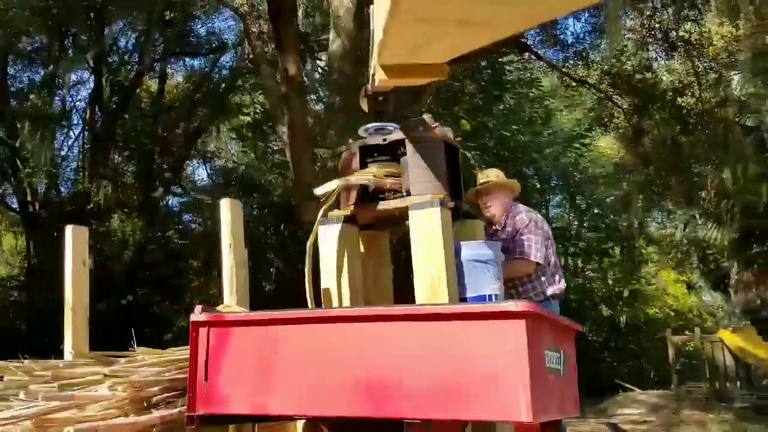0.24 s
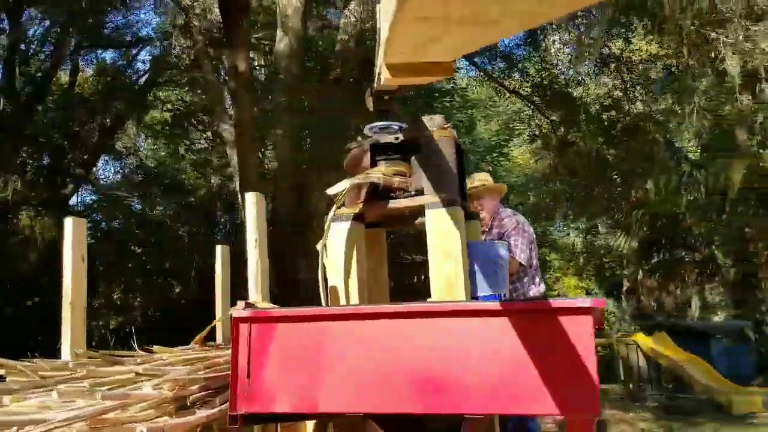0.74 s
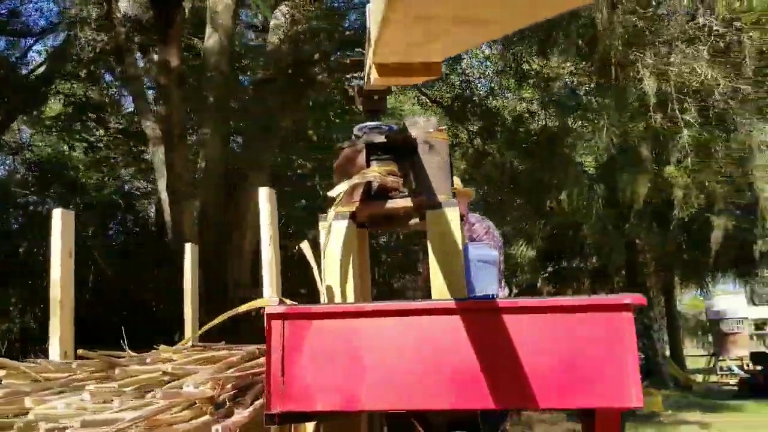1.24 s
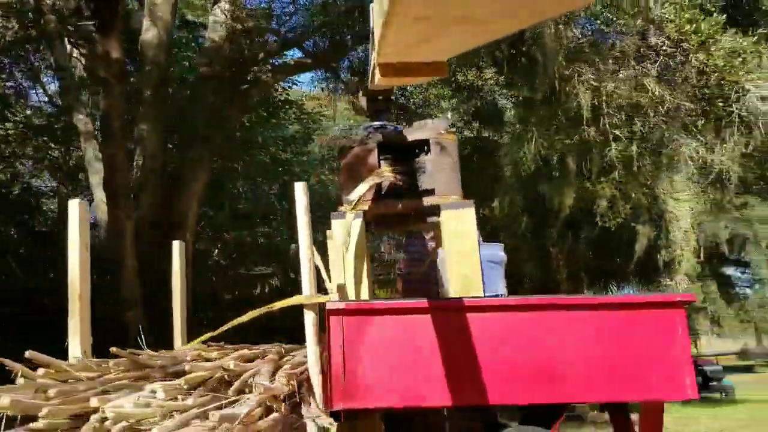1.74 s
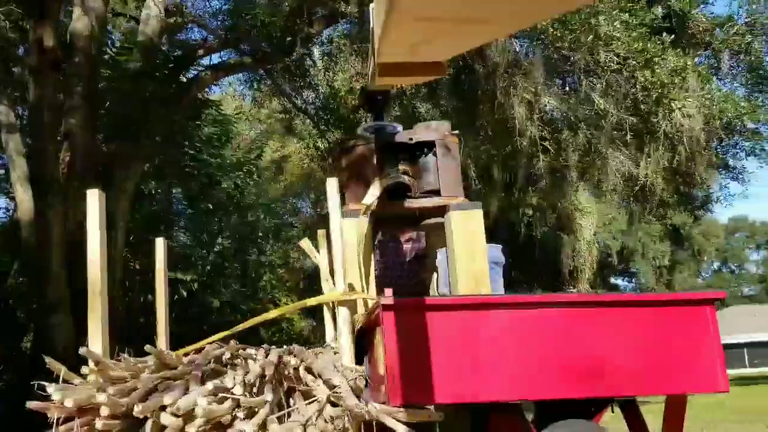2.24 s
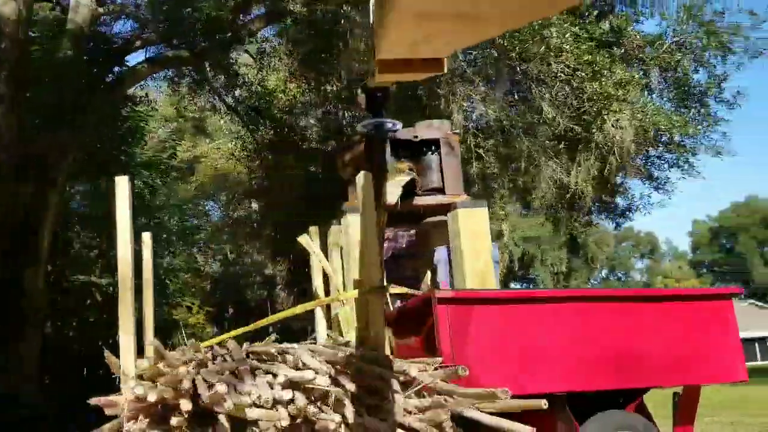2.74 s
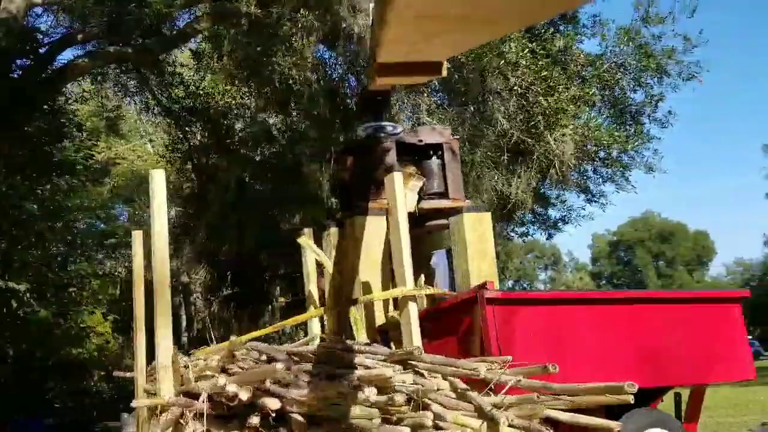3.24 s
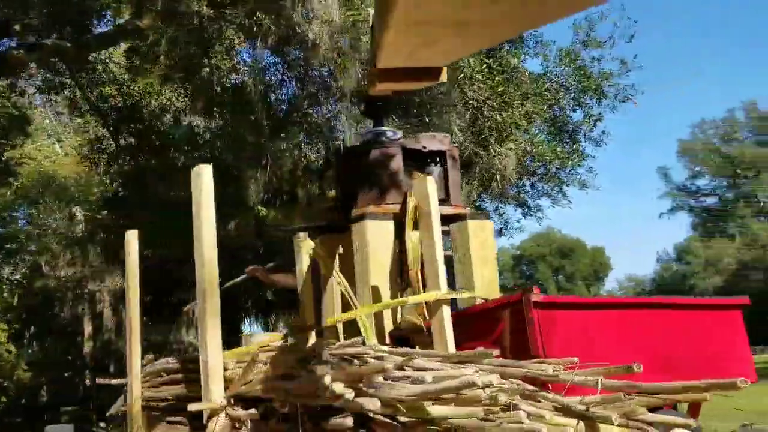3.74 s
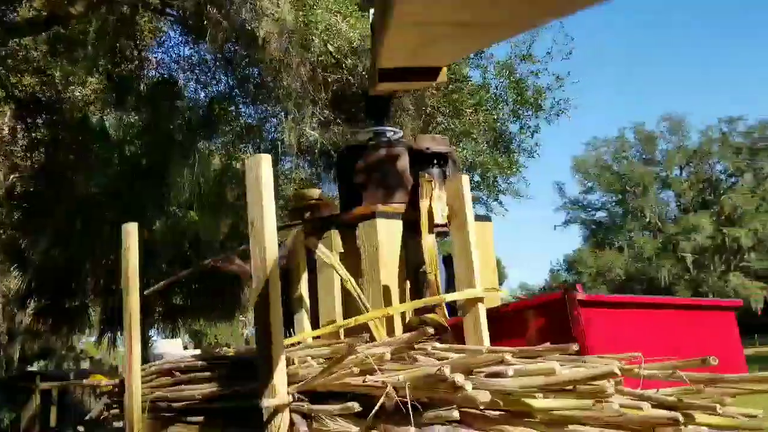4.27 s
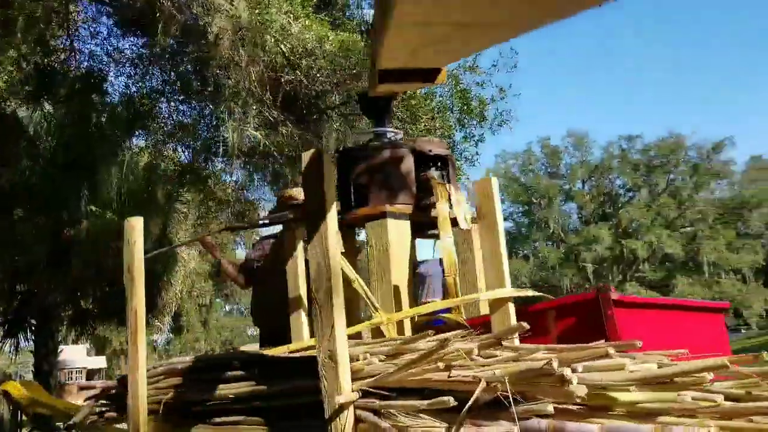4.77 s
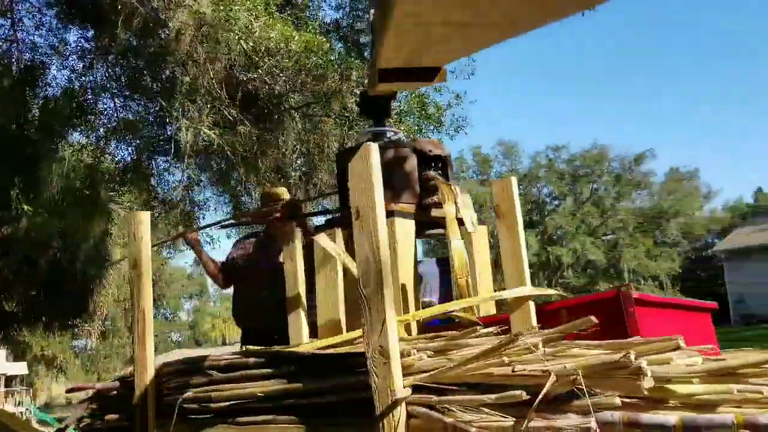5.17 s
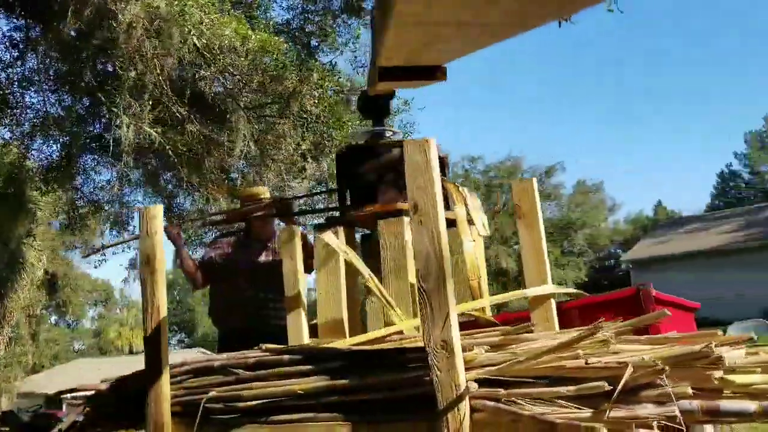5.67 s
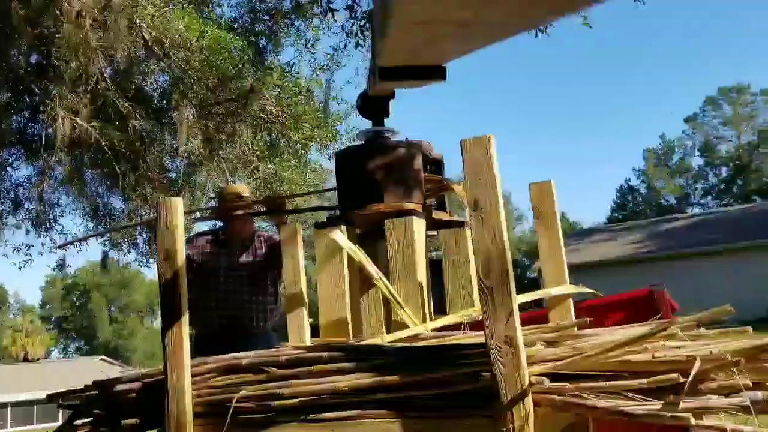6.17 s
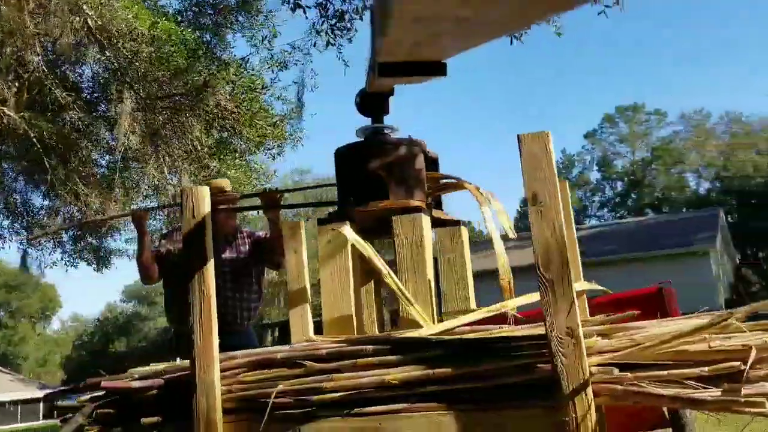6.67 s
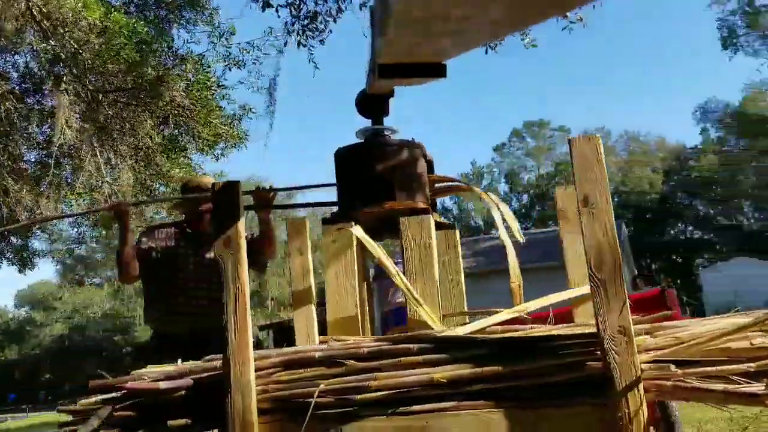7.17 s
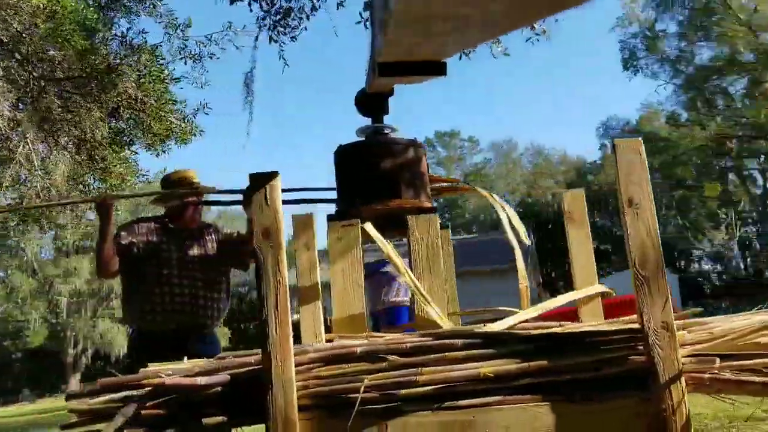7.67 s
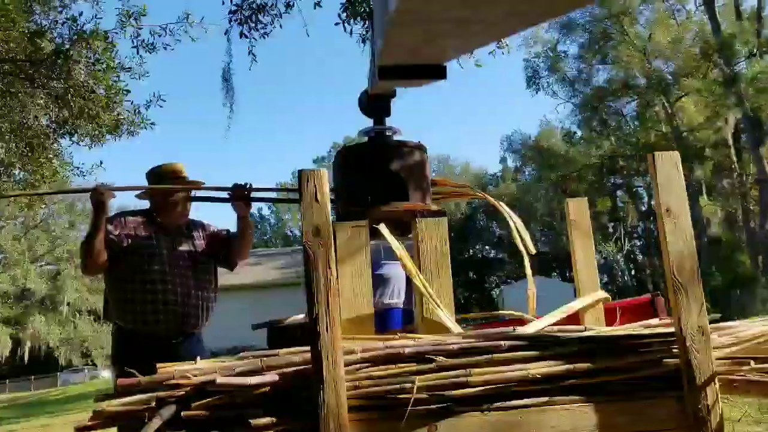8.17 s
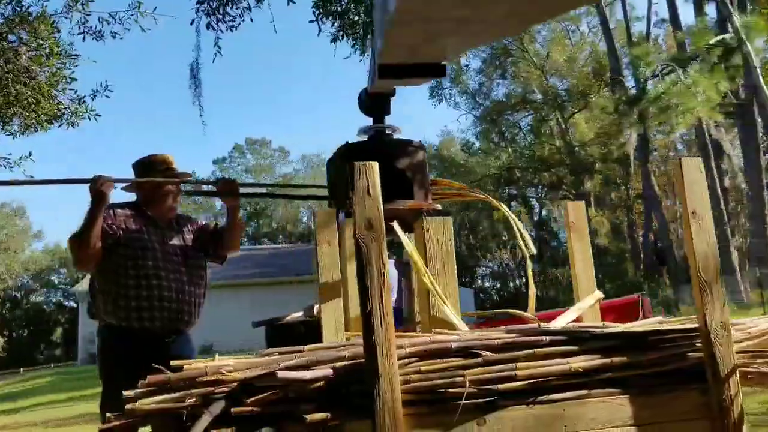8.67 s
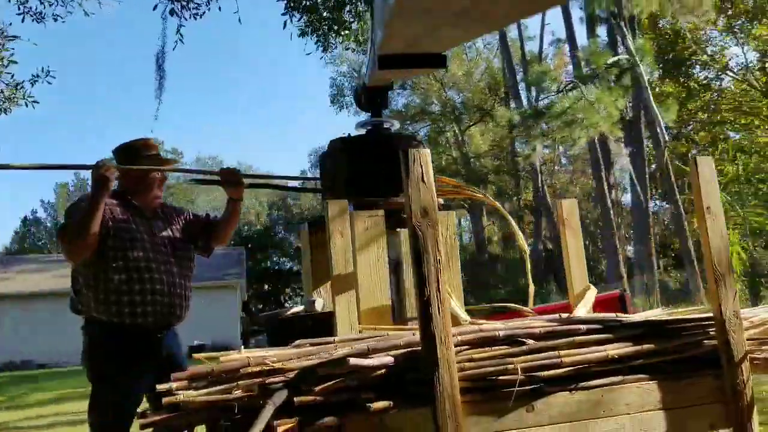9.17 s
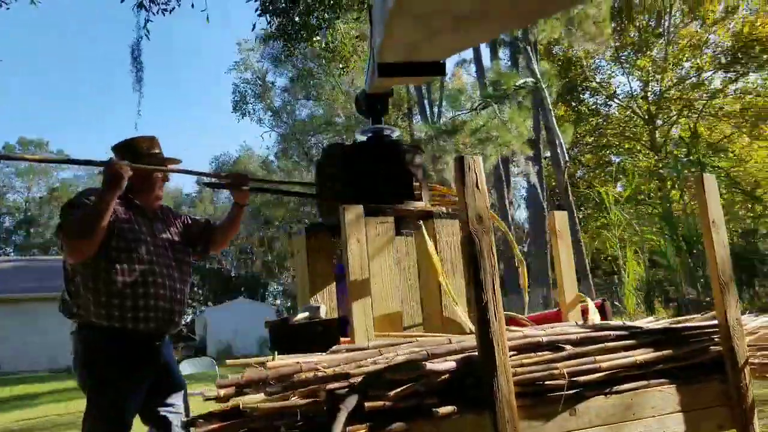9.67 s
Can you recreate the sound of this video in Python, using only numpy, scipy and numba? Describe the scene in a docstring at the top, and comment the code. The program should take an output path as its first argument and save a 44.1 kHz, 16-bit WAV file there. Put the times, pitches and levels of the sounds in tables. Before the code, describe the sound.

A small twin-cylinder engine putters steadily with uneven low thumps, fan rush, metal rattle and iron mill clatter, with dry rustling and occasional stalk snaps.

```python
"""Garden tractor turning a cane mill

A V-twin garden tractor pulls the sweep pole of a cane mill slowly round, with the microphone riding along.
Paired firings, some weak or late, ring the pipe and muffler as thumps; noise puffs behind them make the rasp.
Noise through moving resonances makes the fan's rush, the rattle of the steel covers and the iron mill's clatter.
Fine grains and ticks make dry grass rustle under the tyres, and short bright bursts are snapping stalks."""
import sys
import numpy as np
from scipy import signal
from scipy.fft import rfft, irfft
from scipy.io import wavfile
from scipy.ndimage import uniform_filter1d, map_coordinates
from numba import njit

SR = 44100
rng = np.random.default_rng(int(sys.argv[2]) if len(sys.argv) > 2 else 0)


def materialize(psi):
    """Save the field psi as 16-bit PCM at rate SR to the path in sys.argv[1].

    A 1-D psi becomes a single channel; in a 2-D psi each row is a channel.
    """
    bounded = np.clip(np.atleast_2d(psi).T, -1, 1)
    quanta = np.round(bounded * 32767).astype(np.int16)
    wavfile.write(sys.argv[1], SR, quanta)


N = 437472

# crank position of each cylinder's exhaust stroke: (position [cycles])
STROKES = [.314, .680]
# firings that miss or burn slowly: (time [s], level change [dB], lateness [s])
MISFIRES = [(.373, -5, .0048), (1.453, -7, .0019), (1.587, -7, .002), (2.217, -14, .005),
            (2.375, -1.5, .0022), (2.688, -12, .0045), (2.826, -14, .01), (3.187, 0, .0033),
            (3.229, -1.5, .0018), (4.606, -6, .0041), (4.737, -7, 0), (4.876, 0, .004),
            (4.966, -6.5, .0022), (5.293, -11, 0), (5.847, -1.5, .0016), (6.479, -18, 0), (7.24, -6, 0),
            (8.705, -3, .0012), (9.805, -5, .004)]


def undb(db):
    """Decibels to gain."""
    return np.exp(np.asarray(db) * np.log(10) / 20)


def level(x, db):
    """Scale to an rms level."""
    return x * undb(db) / np.sqrt(np.mean(x ** 2))


def follow(points):
    """Draw a (time [s], value) curve over the whole scene."""
    return np.interp(np.arange(N) / SR, *np.transpose(points))


def colour(x, points):
    """Filter by a smooth (frequency [Hz], level [dB]) spectrum."""
    hz, db = np.transpose(points)
    f = np.arange(N // 2 + 1) * SR / N
    gain = undb(np.interp(np.log(f + 1), np.log(hz), db))
    return irfft(rfft(x) * gain, N)


def ring(x, hz, width_hz):
    """One resonance, gain 1 at its centre."""
    return signal.lfilter(*signal.iirpeak(hz, hz / width_hz, fs=SR), x)


@njit
def moving_ring(x, hz, width):
    """A resonance on each channel whose centre moves, gain 1 at the centre."""
    y = np.empty_like(x)
    for c in range(len(x)):
        band, low = 0., 0.
        for i in range(len(hz)):
            w = np.pi * hz[i] / SR
            g = w + w * w * w / 3  # close to tan(w)
            k = width / hz[i]
            v = (band + g * (x[c, i] - low)) / (1 + g * (g + k))
            band = 2 * v - band
            low = low + 2 * g * v
            y[c, i] = k * v
    return y


def walk(rate):
    """Slow random drift with a spread near 1, stepped at a rate in Hz and smoothed."""
    size = int(SR / rate)
    held = np.repeat(rng.standard_normal(N // size + 1), size)[:N]
    return np.sqrt(3 / 2) * uniform_filter1d(held, size)


def body(x, modes, direct_db, wander, flicker_db):
    """Resonances that wander, come and go, over the broad sound of the excitation itself."""
    out = undb(direct_db) * x
    for hz, width, db in modes:
        gain = undb(db + flicker_db * walk(14))
        centre = hz * (1 + wander * walk(5))
        out = out + gain * moving_ring(x, centre, float(width))
    return out


def grains(spread_db):
    """Dense tiny impacts of very unequal size, a new size every 32 samples."""
    size = np.repeat(rng.exponential(size=N // 32 + 1), 32)[:N]
    return level(rng.standard_normal(N) * undb(spread_db * size), 0)


def ticks(per_s, decay_s, spread_db):
    """Single blades and twigs crack at random: a sharp start and a short fade."""
    strength = undb(spread_db * np.clip(rng.standard_normal(N), -2, 2))
    starts = (rng.random(N) < per_s / SR) * strength
    return signal.lfilter([1], [1, -np.exp(-1 / (decay_s * SR))], starts)


def ports(x, scatter_db):
    """The direct sound at both microphone ports, plus scattered sound that differs between them."""
    return x + undb(scatter_db) * rng.standard_normal((2, N))


def each_cycle(crank):
    """A rough pattern that comes back with every engine cycle and changes within a few turns."""
    patterns = signal.resample(rng.standard_normal((32, 2940)), 11760, axis=1)
    place = (crank % 1 * patterns.shape[1]).astype(int)
    age = crank / 6  # a new pattern takes over every six cycles
    k, blend = age.astype(int), age % 1 * np.pi / 2
    return patterns[k, place] * np.cos(blend) + patterns[k + 1, place] * np.sin(blend)


def after_stroke(crank, lag, width):
    """A swell some part of a cycle after each cylinder's exhaust stroke."""
    swell = 0
    for stroke in STROKES:
        distance = (crank - stroke - lag + .5) % 1 - .5
        swell = swell + np.exp(-.5 * (distance / width) ** 2)
    return swell


def crank_turns(t):
    """Engine cycles gone by: the governed speed sags after each late burn and recovers."""
    # speed the governor holds against the mill, before the sags: (time [s], speed [four-stroke cycles/s])
    governed = [(0.0, 15.563), (0.36, 14.993), (0.87, 14.712), (2.12, 15.502), (2.7, 14.656),
                (2.93, 15.437), (3.64, 14.928), (4.17, 15.608), (4.6, 15.546), (4.94, 14.475),
                (5.66, 15.179), (6.46, 15.319), (6.84, 14.859), (7.82, 14.836), (8.47, 15.345),
                (9.01, 15.032), (9.3, 15.488), (9.92, 14.432)]
    stumble_s = .1  # time to the deepest sag
    sag_hz_per_late_s = 54.21  # cycles per second lost per second of lateness
    sag = 0
    for s, _, late in MISFIRES:
        age = np.maximum(t - s, 0) / stumble_s
        sag = sag + sag_hz_per_late_s * late * age * np.exp(1 - age)
    return np.cumsum(np.interp(t, *np.transpose(governed)) - sag) / SR


def firings(crank, scatter_db, jitter_s):
    """One impulse for each exhaust stroke: two close together, then a gap."""
    turns = (np.arange(int(crank[-1]) + 1)[:, None] + STROKES).ravel()
    times = np.interp(turns[turns < crank[-1]], crank, np.arange(N) / SR)
    chance = rng.standard_normal((len(times), 2))
    db = scatter_db * chance[:, 0]
    for s, weak_db, late in MISFIRES:
        k = np.argmin(abs(times - s))
        db[k] += weak_db
        times[k] += late
    times = times + jitter_s * chance[:, 1]
    pulses = np.zeros(N)
    pulses[np.clip((times * SR).astype(int), 0, N - 1)] = undb(db)
    return pulses


def exhaust(pulses, chamber_gain, push_s, chamber_hz, chamber_width_hz, chamber_db, trap_hz, trap_width_hz):
    """Each rounded push of gas rings the pipe and the muffler chamber, whose side branch traps one band."""
    # exhaust pipe resonances: (centre [Hz], width [Hz], level [dB], polarity [+1 or -1])
    pipe_modes = [(49, 5.7, -4.5, 1), (71.8, 9.8, -0.5, -1), (124.6, 20, -3, 1), (147.7, 58.5, -3.5, 1)]
    push = signal.fftconvolve(pulses, signal.windows.gaussian(601, push_s * SR), "same")
    pipe = sum(np.sign(sign) * undb(db) * ring(push, hz, width) for hz, width, db, sign in pipe_modes)
    uneven_push = push * chamber_gain * undb(0.77 * walk(30))
    chamber = undb(chamber_db) * ring(uneven_push, chamber_hz, chamber_width_hz)
    trapped = ring(chamber, trap_hz, trap_width_hz)
    sound = pipe - chamber + trapped
    # the deepest bass below about 40 Hz falls away
    outlet = signal.butter(1, 40, "high", fs=SR)
    return level(signal.lfilter(*outlet, signal.lfilter(*outlet, sound)), 0)


def hollowed(thump, hollow, boom_db):
    """Shift the weight of the thump from its lower band to its upper one, and weigh its deep boom."""
    upper = ring(thump, hz=180, width_hz=84)
    lower = ring(thump, hz=113.0, width_hz=89)
    boom = ring(thump, hz=74, width_hz=40)
    return thump + hollow * (upper - 1.32 * lower) + (undb(boom_db) - 1) * boom


def bark(pulses, scatter_db):
    """The steep front of each push comes back from the open end and rings the short tailpipe."""
    # higher tailpipe resonances: (centre [Hz], width [Hz], level [dB])
    tailpipe = [(246, 46, -7), (291.5, 30, 0), (329, 28, -5.5), (383, 12, 2), (430, 29, -18)]
    lag_s = .006
    late = np.interp(np.arange(N) - lag_s * SR, np.arange(N), pulses, left=0)
    front = signal.lfilter(*signal.butter(2, 450, fs=SR), late * undb(scatter_db * walk(40)))
    return -level(sum(undb(db) * ring(front, hz, width) for hz, width, db in tailpipe), 0)


def rasp(pulses, crank, rise_s, steady, repeat_db):
    """Turbulent gas leaves the outlet in a puff behind each push, over a steady share of flow."""
    # tone of the gas noise: (frequency [Hz], level [dB])
    gas_tone = [(120, -0.5), (220, -5), (285, 2), (340, -5.5), (390, -4), (480, -17.5), (700, -17),
                (1500, -52)]
    t = np.arange(SR // 20) / SR / rise_s
    puff = signal.fftconvolve(pulses, (t * np.exp(1 - t)) ** 2)[:N]
    gas = rng.standard_normal(N) + undb(repeat_db) * each_cycle(crank)
    return level(colour(ports(gas, scatter_db=-7.0) * (steady + puff), gas_tone), 0)


def taps(crank):
    """A short burst of uneven strength as each valve shuts, twice a cycle."""
    # lag and width in cycles
    return after_stroke(crank, lag=.38, width=.058) * undb(3 * walk(30))


def off_bonnet(x):
    """Add one close reflection off the bonnet, whose path changes a little as the tractor sways."""
    lag_s, drift, reflection_db = .002857, .004, -9.5  # drift is a share of the lag
    place = np.arange(N) - lag_s * SR * (1 + drift * walk(3))
    reflection = np.array([map_coordinates(channel, [place], mode="mirror") for channel in x])
    return x + undb(reflection_db) * reflection


def rattle(crank, tapping):
    """Valve gear chatters against the covers, hardest as a valve shuts and lightly as it opens."""
    # resonances of the steel covers: (centre [Hz], width [Hz], level [dB])
    cover_modes = [(1764, 32, 4.5), (2312, 46, 1), (2583, 30, 8.5), (2778, 87, 0.5), (3460, 280, 2),
                   (3840, 380, -3.5), (4570, 470, -3), (4840, 48, -4)]
    # tone of the rattle: (frequency [Hz], level [dB])
    rattle_tone = [(700, -25), (1300, 15), (1700, 1), (2200, 5), (2700, 1.5), (3100, 1.5), (3600, -3.5),
                   (4400, -1.5), (5300, -13), (6500, -10.5), (10000, -43)]
    opening = after_stroke(crank, lag=.1, width=.04)
    shake = (1 + .38 * tapping + .22 * opening) * undb(.6 * walk(9) + 1.1 * walk(120))
    contact = grains(spread_db=1.9) + undb(2) * each_cycle(crank)
    impacts = ports(contact, scatter_db=-6) * shake
    covers = body(impacts, cover_modes, direct_db=-6, wander=.01, flicker_db=2.5)
    return level(colour(off_bonnet(covers), rattle_tone), 0)


def fan(crank):
    """Cooling air rushes through the shroud, chopped alike from cycle to cycle."""
    # resonances of the fan shroud: (centre [Hz], width [Hz], level [dB])
    shroud = [(572, 92, -9), (667.3, 29, 2.5), (760, 92, -6.5), (903, 130, -4), (1088, 38, -1.5)]
    # tone of the rush: (frequency [Hz], level [dB])
    air_tone = [(20, -22), (60, 9), (200, 8), (420, 3.5), (600, -3), (900, -3.5), (1120, -3.5),
                (1350, -12.5), (2000, -62), (5000, -39)]
    air = ports(rng.standard_normal(N) + each_cycle(crank), scatter_db=-2)
    gusts = undb(.6 * walk(10) + .9 * walk(45))
    air = air * gusts * (1 + .2 * after_stroke(crank, lag=.03, width=.1))
    return level(colour(body(air, shroud, direct_db=-4.5, wander=0.0054, flicker_db=1.45), air_tone), 0)


def whine(crank):
    """The flywheel fins sing faintly at high multiples of the engine speed; each line flutters on its own."""
    # lines of the whine: (multiple of the cycle rate, level [dB])
    fins = [(40, -5), (50, -4), (52, -3), (60, 0), (62, -3)]
    lines = 0
    for order, db in fins:
        phase = 2 * np.pi * order * crank + .7 * walk(25)
        lines = lines + undb(db + 4 * walk(11)) * np.sin(phase)
    return level(lines, 0)


def clatter(crank, tapping):
    """The iron mill chatters in step with the engine, and now and then gives a single knock."""
    # resonances of the mill's iron frame: (centre [Hz], width [Hz], level [dB])
    iron_modes = [(1628, 19, 10.5), (1928, 47, -0.5), (2005, 64, -3), (2096, 33, 1), (2304, 60, -3.5),
                  (2464, 31, 5), (2750, 110, -5)]
    # tone of the clatter: (frequency [Hz], level [dB])
    mill_tone = [(1000, -59), (1600, -5.5), (2000, 8.5), (2600, 0.5), (3100, -23), (4500, -5.5),
                 (7000, -25)]
    # single knocks: (time [s], strength against the steady shake of 1 [dB])
    knock_list = [(2.396, 5), (2.816, 7), (3.638, 6), (3.856, 5), (4.240, 11), (4.454, 7), (4.716, 3),
                  (4.820, 2), (5.410, 5), (5.608, 5), (5.732, 3), (5.863, 6), (6.041, 4), (6.826, 5),
                  (7.779, 9), (9.669, 4)]
    knock_decay_s = .007
    blows = np.zeros(N)
    for s, db in knock_list:
        blows[int(s * SR)] = undb(db)
    knocks = signal.lfilter([1], [1, -np.exp(-1 / (knock_decay_s * SR))], blows)
    shake = (1 + .42 * tapping) * undb(1.5 * walk(110) + .4 * walk(9))
    contact = grains(spread_db=1.5) + .7 * each_cycle(crank)
    impacts = ports(contact, scatter_db=-1) * (shake + knocks)
    iron = body(impacts, iron_modes, direct_db=-8, wander=.003, flicker_db=2)
    return level(colour(iron, mill_tone), 0)


def crush():
    """Cane fibres rasp as they are squeezed in the mill straight ahead."""
    # tone of the squeezed fibres: (frequency [Hz], level [dB])
    fibre_tone = [(600, -16), (1100, 6.5), (1500, 12), (2000, 11), (2800, -3), (4000, -3.5), (8000, -27)]
    return level(colour(ports(rng.standard_normal(N), scatter_db=0) * undb(1.5 * walk(12)), fibre_tone), 0)


def rustle(crank):
    """Dry grass crushed by the tyres, shaken in step with the engine, with single crackles."""
    # tone of the grass: (frequency [Hz], level [dB])
    grass_tone = [(2500, -6.5), (5300, 5.5), (6200, 2), (7000, 2), (7900, 8), (8700, -0.5), (9900, 1),
                  (10600, -2), (11900, 2.5), (14300, -0.5), (15300, 1), (15900, -3)]
    blades = ports(grains(spread_db=1.7) + undb(-5.0) * each_cycle(crank), scatter_db=7.5)
    shake = (1 + .17 * after_stroke(crank, lag=.35, width=.09)) * undb(1.2 * walk(25))
    crackle = .45 * ticks(per_s=45, decay_s=.003, spread_db=3.5)
    return level(colour(off_bonnet(blades * (shake + crackle)), grass_tone), 0)


def snaps():
    """Brittle stalks break in a short, bright burst of parting fibres."""
    # stalks snapping: (time [s], starting gain on the fibre noise [dB], decay [s])
    breaks = [(.828, -43, .012), (1.701, -43, .007), (2.361, -44, .008), (2.435, -45, .007),
              (3.185, -44, .02), (3.235, -45, .015), (3.486, -44, .005), (3.65, -43, .012),
              (4.135, -43, .009), (4.556, -38.5, .009), (4.994, -42, .005), (5.431, -44, .006),
              (6.356, -41, .007), (6.762, -40, .011), (7.215, -44, .005), (7.915, -44, .008),
              (7.941, -38, .009), (8.149, -45, .006), (8.592, -45, .008), (8.768, -42, .009),
              (8.92, -44, .009), (9.545, -43, .008), (9.615, -36, .013)]
    # tone of a snapping stalk: (frequency [Hz], level [dB])
    snap_tone = [(2000, -2), (5000, 2), (6800, 0), (7900, 3.5), (9000, 2), (12000, 4), (15800, 2)]
    t = np.arange(N) / SR
    burst = sum(undb(db) * (t >= s) * np.exp(-abs(t - s) / decay) for s, db, decay in breaks)
    fibres = ports(grains(spread_db=0.0), scatter_db=-16)
    return burst * level(colour(fibres, snap_tone), 6.5)


def shudder():
    """The swaying frame shakes the microphone with a faint deep rumble."""
    # tone of the rumble: (frequency [Hz], level [dB])
    rumble_tone = [(8, -20), (20, -12), (32, -10), (45, 1), (70, -18), (150, -39.5)]
    return level(colour(ports(rng.standard_normal(N), scatter_db=-5), rumble_tone), -50)


def round_the_body(x):
    """Sound from the left reaches the right port later and shaded; the bass takes the longest way."""
    # extra path round the microphone body: (frequency [Hz], delay [s])
    port_delay = [(75, .0007), (150, .00057), (450, .0005), (700, .00044), (1000, .00034), (1500, .00035),
                  (2100, .00044), (8000, .00043)]
    # shading by the microphone body: (frequency [Hz], level [dB])
    shade = [(70, 0.2), (200, -2), (380, -3), (700, -7), (1100, -6), (1600, 1), (2400, -1), (4400, -5),
             (6200, -3.5), (7800, -13), (12000, -12.5), (15000, -20)]
    f = np.arange(N // 2 + 1) * SR / N
    delay = np.interp(f, *np.transpose(port_delay))
    delayed = irfft(rfft(x) * np.exp(-2j * np.pi * f * delay), N)
    return colour(delayed, shade)


def scene():
    """The engine lies to the left and the mill ahead."""
    # exhaust thump before its bands are reweighed: (time [s], level [dB])
    thump_curve = [(0, -21.5), (.5, -20.5), (1.3, -20.5), (2, -20), (2.5, -21), (3.7, -20), (4.4, -20.5),
                   (4.9, -21), (5.1, -19), (5.6, -19.5), (6.4, -21), (7.6, -19.5), (8.5, -19), (9.3, -21),
                   (9.92, -20)]
    # turn towards a hollower, higher thump: (time [s], hollowness [0-1])
    hollow_curve = [(0, 0.17), (6.6, 0.03), (7.8, 0.03), (8.3, 0.43), (9.92, 0.36)]
    # deep boom within the thump: (time [s], level [dB])
    boom_curve = [(0, -0.5), (4.2, -1.5), (4.9, -3), (5.9, -1), (6.6, -0.5), (7.3, -4), (8, -2), (8.5, 1.7),
                  (9.92, 1.3)]
    # effort of the engine, heard in the rasp and bark of the gas: (time [s], relative level [dB])
    effort_curve = [(0, -6), (.5, -3), (1.2, 1), (1.6, -2), (2, 2.5), (2.5, 0.5), (3.4, 0.5), (4.3, 1.5),
                    (5.05, -4), (5.8, 1.5), (6.8, -1), (7.9, 4.5), (8.5, -1), (8.8, 0.5), (9.3, -9.5),
                    (9.92, -4.5)]
    # cooling air: (time [s], level [dB])
    air_curve = [(0, -30.5), (1.6, -31.5), (2, -30.5), (2.9, -33.5), (3.2, -32), (5.3, -31), (6.7, -28),
                 (7.3, -30), (8.5, -30.5), (8.8, -29), (9.6, -28.5), (9.92, -30.5)]
    # whine of the flywheel fins: (time [s], level [dB])
    whine_curve = [(0, -49), (2, -56), (3.5, -58), (4.6, -52), (6, -52), (8.2, -47), (8.8, -42), (9.5, -38),
                   (9.92, -38)]
    # how hard the ground jolts the tractor, which drives the rattle: (time [s], jolt [dB])
    jolt_curve = [(0, 0.5), (.6, 0), (1.6, -1.9), (2.2, 1.5), (3.05, -1.5), (3.22, 3.5), (3.4, 0.5),
                  (4.3, 4), (4.65, 6.5), (5.2, 4), (6.2, 5.5), (6.9, 4.5), (7.4, 2), (7.85, 3.5), (8.4, 0),
                  (8.9, 0), (9.92, 0.5)]
    # rustle under the tyres: (time [s], level [dB])
    grass_curve = [(0, -44), (.55, -47.5), (1.0, -45), (1.35, -45), (2.1, -42.5), (2.4, -44.5), (3.0, -43),
                   (3.22, -43), (3.5, -43.5), (3.95, -43.5), (4.2, -41), (4.6, -40.6), (5.2, -41.5),
                   (5.8, -40.5), (6.3, -39.5), (6.75, -42), (7.1, -42.5), (7.8, -42), (8.3, -44),
                   (8.8, -44), (9.15, -45), (9.55, -41.5), (9.92, -46)]
    # cane squeezed between the rollers: (time [s], level [dB])
    rollers_curve = [(0, -42.5), (.7, -51), (1.1, -59), (2, -53), (2.9, -65), (4.6, -66), (5.5, -54),
                     (5.95, -39.5), (6.6, -46), (6.9, -57), (7.7, -49), (8.4, -72), (9.92, -63)]
    # clatter of the mill under its load of cane: (time [s], level [dB])
    mill_curve = [(0, -51), (1.4, -44.5), (2.3, -45), (2.8, -45.5), (3.25, -40.5), (3.5, -44), (4.3, -43.5),
                  (4.55, -39.5), (4.82, -38.5), (5.1, -41), (5.55, -40.5), (6.25, -42), (6.5, -40.5),
                  (7.05, -41.5), (7.5, -45.5), (8.6, -48), (8.9, -41), (9.3, -46.5), (9.65, -41.5),
                  (9.92, -51)]

    crank = crank_turns(np.arange(N) / SR)
    pulses = firings(crank, scatter_db=0.85, jitter_s=0.00029)
    second = crank % 1 > .5  # the half cycle in which the second cylinder fires
    # the second cylinder rings the muffler chamber 0.5 dB harder than the first
    chamber_gain = undb(0.5 * (second - .5))
    thump = exhaust(pulses, chamber_gain, push_s=0.0014, chamber_hz=203.6, chamber_width_hz=67.5,
                    chamber_db=3.0, trap_hz=235.3, trap_width_hz=40.6)
    thump = undb(follow(thump_curve)) * hollowed(thump, follow(hollow_curve), follow(boom_curve))
    # the second firing of each pair is the sharper one, by 2 dB
    sharp = pulses * undb(2 * second)
    puffs = undb(2.5) * rasp(sharp, crank, rise_s=0.0026, steady=.22, repeat_db=8)
    barks = undb(0.7) * bark(sharp, scatter_db=1.0)
    gas = undb(-39 + follow(effort_curve)) * (puffs + barks)

    tapping = taps(crank)
    air = undb(follow(air_curve)) * fan(crank)
    fin_whine = undb(follow(whine_curve)) * whine(crank)
    # the rattle rises 0.54 dB for each dB of jolt
    covers = undb(-40.5 + 0.54 * follow(jolt_curve)) * rattle(crank, tapping)
    grass = undb(follow(grass_curve)) * rustle(crank)
    left, right = thump + gas + air + fin_whine + covers + grass + snaps()
    mill = undb(follow(rollers_curve)) * crush() + undb(follow(mill_curve)) * clatter(crank, tapping)
    return np.array([left, round_the_body(right)]) + mill + shudder()


def record(dry):
    """The recorder cuts the top steeply above 15.85 kHz."""
    return signal.sosfilt(signal.ellip(10, .2, 80, 15850, fs=SR, output="sos"), dry)


dry = scene()
out = record(dry)
materialize(out)
```